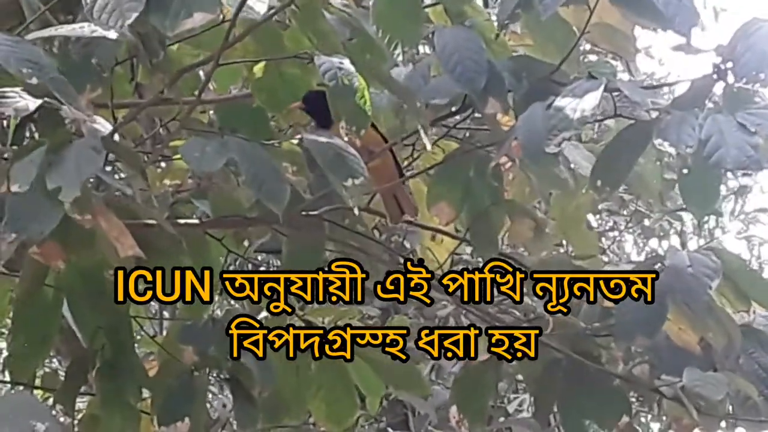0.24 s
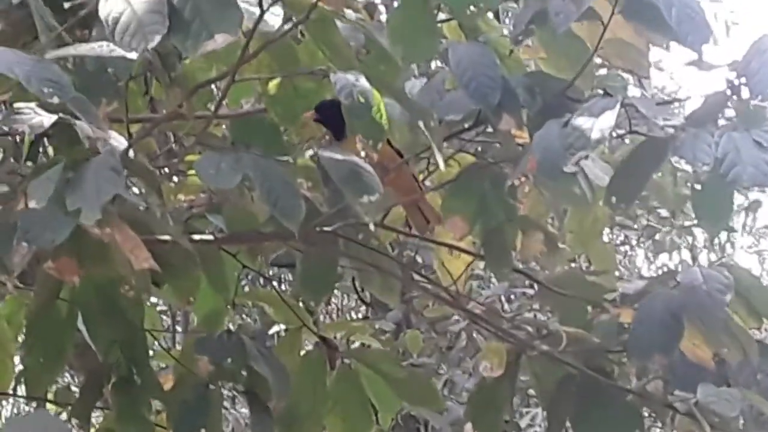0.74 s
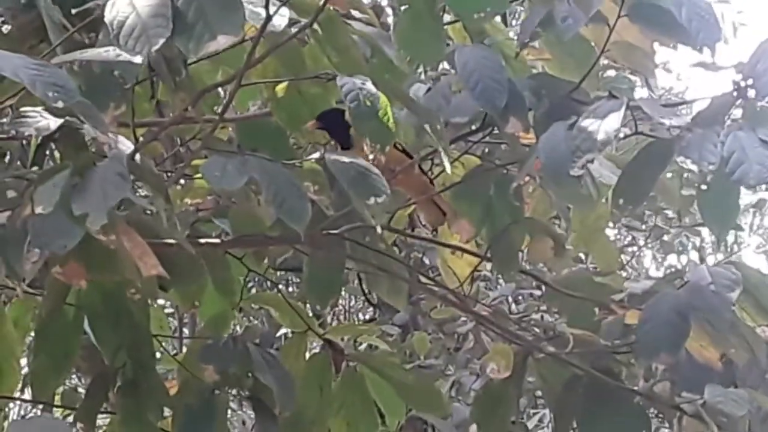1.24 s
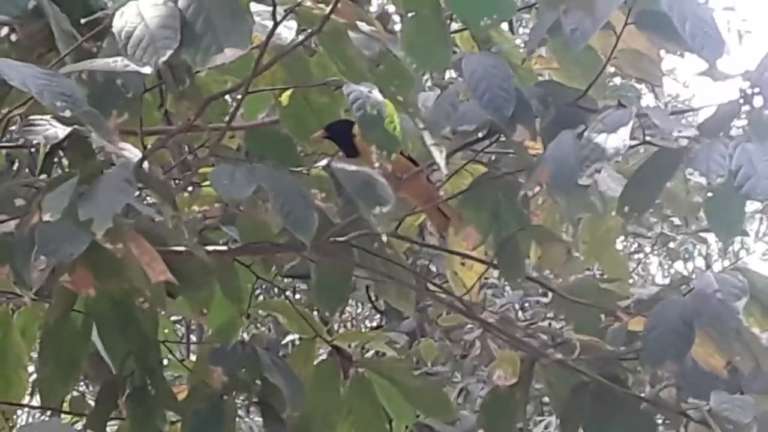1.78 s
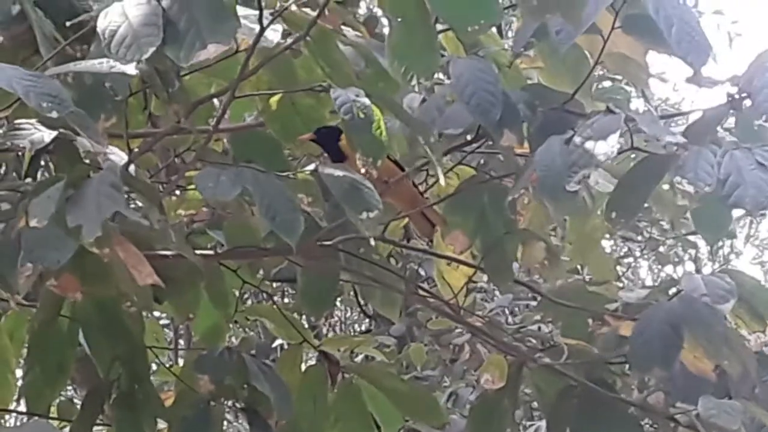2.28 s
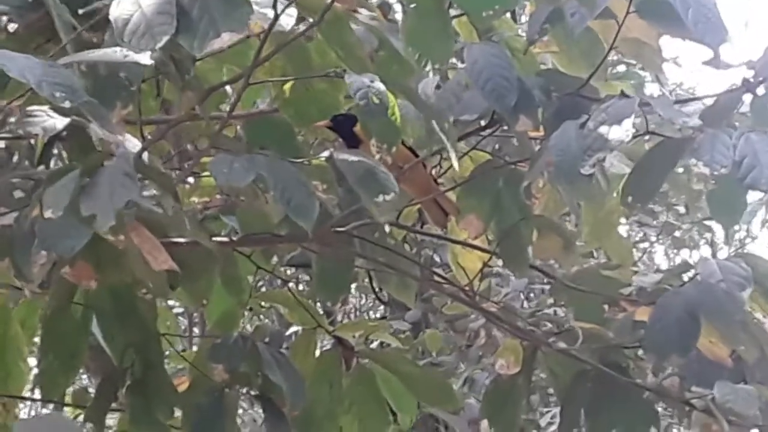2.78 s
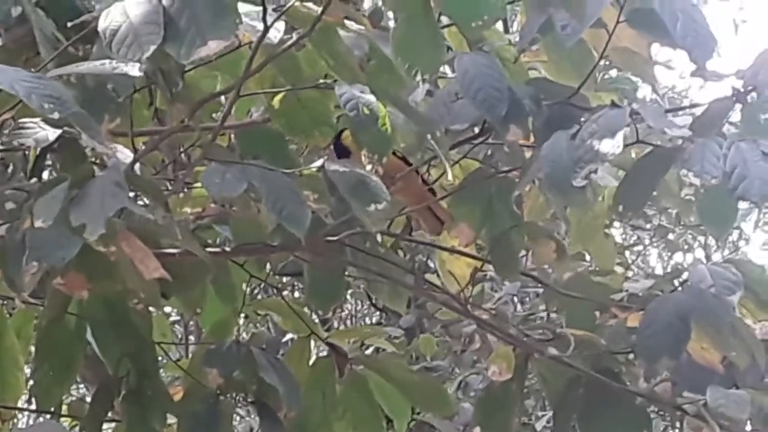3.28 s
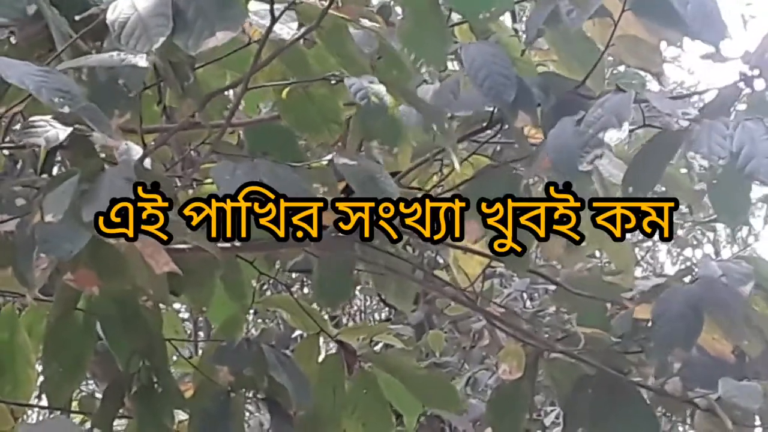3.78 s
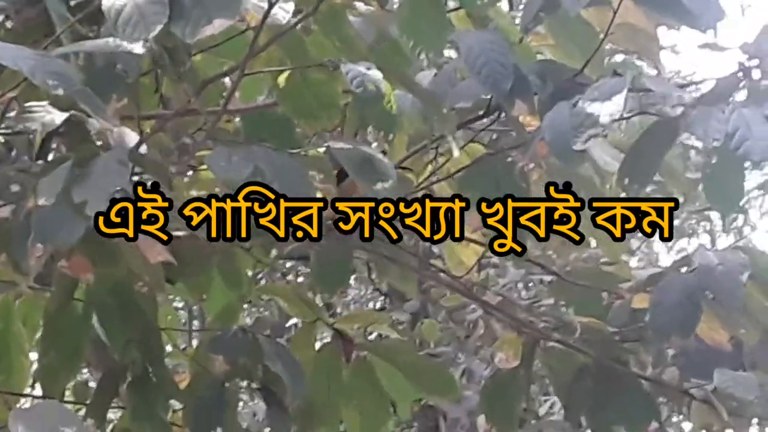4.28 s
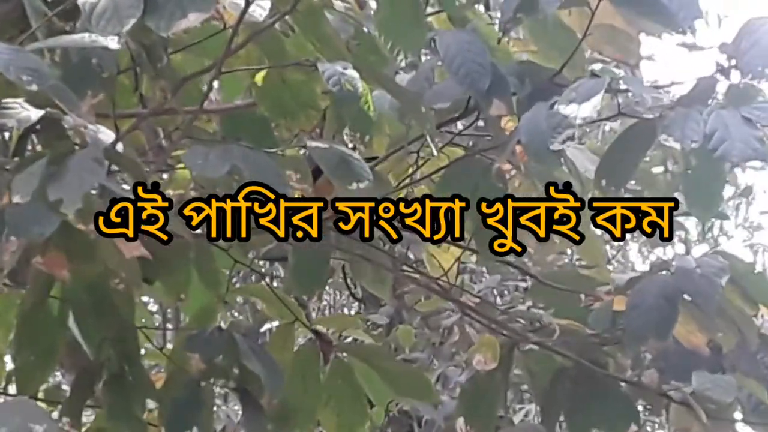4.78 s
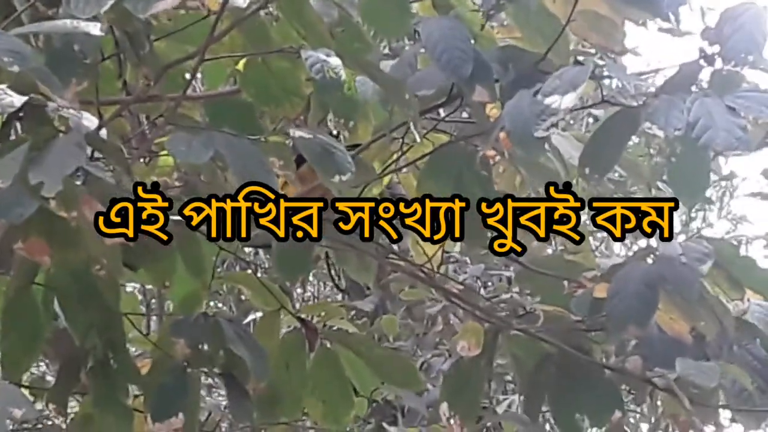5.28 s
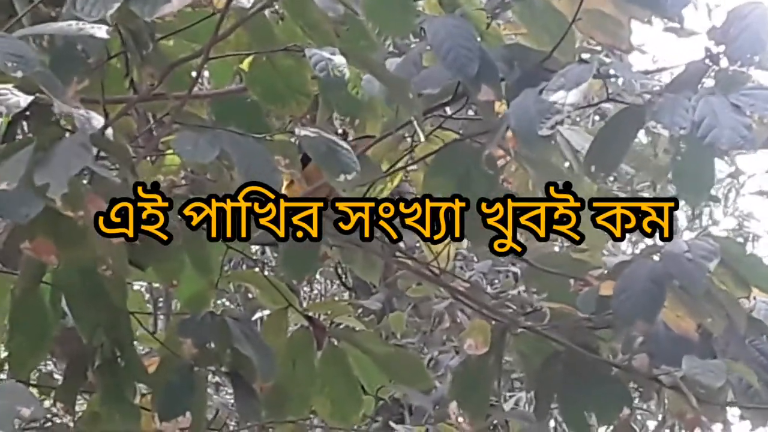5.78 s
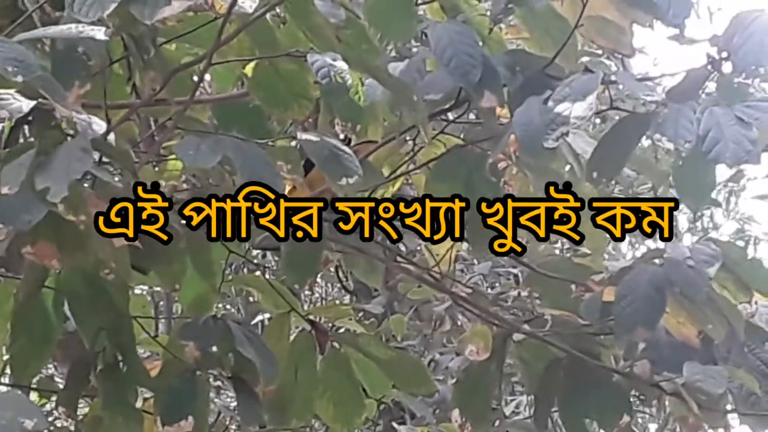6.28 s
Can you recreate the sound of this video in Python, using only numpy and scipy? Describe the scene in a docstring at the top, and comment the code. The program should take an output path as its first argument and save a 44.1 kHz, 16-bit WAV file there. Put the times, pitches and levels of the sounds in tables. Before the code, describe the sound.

Outdoors among trees, a small bird chips from start to finish: tight pairs of very short, high downward ticks, about five pairs a second, almost like a pulsing insect. They grow fainter around 3 to 4.3 seconds and become clearer again after 5. At 0.64 an oriole gives a brief hoarse rasp, then three loud, nearly pure fluty whistles at about 0.86, 1.09 and 1.3: a quick swoop down, a lower note, and a longer falling note. The same phrase returns with a rasp at 4.55 and whistles at 4.72, 4.97 and 5.17. Leaves and trunks return short echoes and soft tails. Distant birds give buzzy calls near 0, 2.6 and 5.6, and sinking whistles around 3.4 and 3.8, plus faint rising notes and hoots. Faint hiss continues, with soft low handling bumps, notably near 0.95, 5.0 and 5.5, until the end around 6.6.

```python
"""Oriole in a leafy tree

An oriole sings twice: a short hoarse rasp, then three fluty falling whistles, near-pure tones with faint overtones.
Trunks and foliage echo it: discrete reflections plus decaying noise tails.
A small bird keeps up double downward chips about five times a second; far birds are short pitch glides.
Nudges of the hand-held microphone are swells of low coloured noise, over a faint steady hiss.
"""
import sys
import numpy as np
from scipy import signal
from scipy.fft import rfft, irfft
from scipy.io import wavfile
from scipy.ndimage import uniform_filter1d

SR = 44100
rng = np.random.default_rng(int(sys.argv[2]) if len(sys.argv) > 2 else 0)


def transcribe(signal):
    """Save signal, clipped to [-1, 1], as a 16-bit WAV file at the path in sys.argv[1]."""
    frames = np.atleast_2d(signal).T
    limited = np.clip(frames, -1, 1)
    pcm = np.round(limited * 32767).astype(np.int16)
    wavfile.write(sys.argv[1], SR, pcm)


N = 288414
TIME_S = np.arange(N) / SR

# Hiss colour: f/Hz, relative density/dB
HISS_COLOUR = [(25, -9.5), (100, -1.5), (200, -9), (400, -10.5), (850, -9.5), (1000, -14), (2600, -13),
               (4000, -11), (4900, -8.5), (5600, -18.5), (8800, -22), (15500, -19)]
HISS_DB, CUTOFF_HZ = -74, 15800

# Stronger microphone nudges: onset t/s, relative level/dB
BUMPS = [(.01, -44), (.287, -49.5), (0.947, -40), (1.785, -48), (2.338, -52), (4.562, -44.5),
         (4.859, -49.5), (5.01, -36), (5.112, -40), (5.206, -47.5), (5.534, -38.5), (5.717, -56),
         (5.816, -49.5), (5.904, -43.5), (6.477, -55)]
# Bump noise colour: f/Hz, relative density/dB
BUMP_COLOUR = [(20, -32), (45, -7.5), (75, 3.5), (120, 1), (180, -14), (280, -23.5), (450, -44),
               (900, -78.5)]
# weak nudges at random times
NUDGES_PER_S, NUDGE_REL_DB, NUDGE_SPREAD_DB = 1.5, -68, 6

# Far buzzy three-syllable calls: t/s, relative level/dB
BUZZY_CALLS = [(-.135, -57), (2.579, -60.5), (5.624, -57.5)]
# Their syllables: offset t/s, length/s, start f/Hz, end f/Hz, relative level/dB, buzz spread/Hz
BUZZY_SYLLABLES = [(0, .07, 5680, 5050, -1, 370), (0.057, .1, 6500, 6000, -7, 318),
                   (0.097, 0.0844, 4990, 4800, 3, 443)]
# Level course of the far rising notes: t/s, relative level/dB
RISING_LEVEL = [(2.57, -77), (3.11, -83), (3.645, -56.5), (4.19, -76)]
RISING_START_S, RISING_INTERVAL_S, RISING_LENGTH_S = 2.565, .27, .047
RISING_FROM_HZ, RISING_TO_HZ, RISING_BUZZ_HZ = 2500, 3410, 112
# Far sinking whistles: t/s, length/s, start f/Hz, end f/Hz, relative level/dB
FAR_WHISTLES = [(0.328, 0.25, 4470, 4250, -76.5), (1.039, 0.12, 4176, 4110, -65.5),
                (1.153, .15, 3947, 3428, -68.5), (1.597, 0.053, 3375, 3100, -66.5),
                (1.94, 0.083, 1610, 1580, -67.5), (2.13, .049, 1537, 943, -68.5),
                (3.378, .13, 3802, 3404, -59), (3.55, 0.17, 4180, 3910, -68.5),
                (3.79, .29, 2780, 2704, -59), (4.06, 0.273, 2773, 2676, -69),
                (5.712, 0.22, 3923, 3552, -61.5), (6.155, .107, 1740, 1120, -68.5),
                (6.33, .15, 4490, 4410, -70), (6.343, .13, 2597, 2503, -80.5)]
FAR_WAVER = .016  # share of the start pitch
# Short harsh dropping notes: t/s, relative level/dB
HARSH_NOTES = [(.088, -65.5), (2.29, -71)]
HARSH_LENGTH_S, HARSH_FROM_HZ, HARSH_TO_HZ, HARSH_BUZZ_HZ = .045, 4350, 2950, 430
# Thin high notes of one far bird: t/s
THIN_NOTES = [2.47, 3.077, 3.281, 3.838, 4.109]
THIN_HZ, THIN_LENGTH_S, THIN_REL_DB, THIN_WAVER_HZ = 6550, .095, -85, 50
# Low hoots of another: t/s
HOOTS = [2.437, 2.573, 3.721, 3.84]
HOOT_HZ, HOOT_LENGTH_S, HOOT_REL_DB, HOOT_WAVER_HZ = 885, .07, -74, 50.4

# Small bird, peak of the first chip of each pair: t/s
CHIP_TIMES = [.138, .341, .559, .767, .939, 1.145, 1.335, 1.519, 1.695, 1.882, 2.077, 2.278, 2.493, 2.676,
              2.869, 3.095, 3.303, 3.555, 3.749, 3.945, 4.141, 4.351, 4.53, 4.742, 4.965, 5.156, 5.356,
              5.573, 5.771, 6.03, 6.253, 6.473]
# Small bird's level course: t/s, relative level/dB
CHIP_LEVEL = [(.3, -55.5), (1, -50.5), (1.55, -50.5), (2.3, -56), (3.1, -59.5), (4.15, -63.5), (5.2, -49.5),
              (5.7, -51), (6.4, -48)]

# Rasp opening each phrase: t/s, length/s, starting f/Hz, relative level/dB
RASPS = [(0.643, .051, 894.3, -47), (4.551, .068, 975.4, -45.5)]
# Rasp partial strength: f/Hz, relative level/dB
RASP_COLOUR = [(800, -9), (1700, -3.5), (2600, -0.5), (3400, -4), (4300, -1), (5200, -12), (6800, -10),
               (8000, -26), (13000, -16), (16000, -16)]
RASP_ATTACK_S, RASP_RELEASE_S, RASP_SAG_HZ_PER_S = .014, .01, 2300
RASP_SLACK_DB, RASP_SLACK_PITCH = -26, .25  # without effort: weaker, and lower by this share
RASP_CLOSED_HZ, RASP_OPEN_HZ = 1206, 6110  # upper edge of the partials as the bill opens

# Whistles, two phrases of a swoop, a low note and a long note:
# t/s, length/s, swell/s, pitch settling/s, steepest fall after/s, ease of fall/s,
# onset f/Hz, held f/Hz, end f/Hz, end drift/(Hz/s), relative level/dB, change after fall/dB,
# catch at foot of fall/dB, overtones/dB, extra overtones above 6 kHz/dB
WHISTLES = [(.857, .12, 0.052, 0.035, .094, .0123, 1715, 1847, 704, 0, -22.5, 0, 0, 5, -10.5),
            (1.087, .188, .048, .02, .101, .0205, 1410, 1392, 913.4, -350, -21, -4, -2, -1, -6.5),
            (1.304, 0.23, .016, .013, 0.12, .013, 2000, 1788, 1139, 450, -21.5, 2, 0, 1, -1.5),
            (4.719, 0.11, 0.046, .026, 0.095, 0.015, 1694, 1930, 707, 0, -23, 0, -0.5, 3, -8.5),
            (4.969, .19, 0.03, .0224, 0.089, 0.016, 1545, 1502, 844, 350, -25, 7.5, -17, -1, -5),
            (5.17, 0.26, 0.015, .018, 0.12, .0135, 2043, 1740, 1134, -600, -22.5, -1, 1.5, -2, 6)]
# Whistle overtone strength: f/Hz, relative level/dB
WHISTLE_OVERTONES = [(1700, -11.5), (2400, -27), (3000, -32.5), (3500, -34), (4400, -46), (5500, -50.5),
                     (6300, -57), (7200, -49.5), (7900, -53.5), (9200, -65), (10600, -56.5), (12300, -63.5),
                     (14300, -51.5), (16000, -55)]
# Throat gain, favouring upper pitches: f/Hz, gain/dB
THROAT = [(700, -22.5), (880, -13.5), (1150, -10.5), (1600, 0.5), (1900, 2)]
SWELL_STEEPNESS, ONSET_S, RELEASE_S, FADE_DB_PER_S = 4.3, .003, .027, 58
IDLE_DB = -28  # floor of the swell
# brief change of level and pitch at the foot of the fall
CATCH_AFTER_EASES, CATCH_S, CATCH_PITCH_PER_DB = 1.25, .016, .003
# the low end is less steady, and purer
END_WAVER, END_WAVER_RATE_HZ, END_OVERTONE_DB = .0098, 45, -1.5
# Reflections off branches and ground: delay/s, share of the direct sound
ECHOES = [(.0053, .26), (0.0098, .16), (0.034, .08)]


def from_db(db):
    """Decibels to amplitude gain."""
    return 10 ** (np.asarray(db) / 20)


def rms_one(x):
    """Scale to unit power."""
    return x / np.sqrt(np.mean(x ** 2) + 1e-20)


def at_hz(points, hz):
    """Gain at hz, interpolated in dB over log frequency."""
    knots_hz, db = np.transpose(points)
    return from_db(np.interp(np.log(hz + 1e-9), np.log(knots_hz), db))


def drift(rate_hz, size=N):
    """Straight lines between normal random knots of spread 1, rate_hz knots per second."""
    steps = np.arange(size) * rate_hz / SR
    return np.interp(steps, np.arange(size), rng.standard_normal(size))


def noise(colour):
    """Unit-power steady noise: a white spectrum weighted by colour."""
    white = rfft(rng.standard_normal(N))
    gain = at_hz(colour, np.fft.rfftfreq(N, 1 / SR))
    return rms_one(irfft(white * gain, N))


def phase_of(hz):
    """Phase in radians: the running integral of pitch."""
    return 2 * np.pi * np.cumsum(hz) / SR


def add(track, start_s, sound):
    """Mix a sound into a track, dropping what lies outside."""
    at = round(start_s * SR) + np.arange(len(sound))
    inside = (at >= 0) & (at < N)
    track[at[inside]] += sound[inside]


def above(x, edge_hz):
    """Fourth-order Butterworth high-pass."""
    return signal.sosfilt(signal.butter(4, edge_hz, "high", fs=SR, output="sos"), x)


def scatter(x, delay_s, swell_s, t60_s):
    """Countless leaves and trunks return a noise tail that swells and decays exponentially."""
    t = TIME_S[:2 * SR]
    late_s = np.maximum(t - delay_s, 0)
    shape = (1 - np.exp(-late_s / swell_s)) * from_db(-60 * late_s / t60_s)
    spectrum = rfft(rng.standard_normal(len(t)) * shape)
    # spread the energy evenly over frequency
    local_power = uniform_filter1d(abs(spectrum) ** 2, size=100)
    tail = irfft(spectrum / np.sqrt(local_power)) * (t > delay_s)
    return signal.fftconvolve(x, tail[:SR])[:N]


def hiss():
    """Steady coloured noise."""
    return from_db(HISS_DB) * noise(HISS_COLOUR)


def bumps(rise_s=.017, level_db=-7):
    """Each microphone nudge swells a low rumble, over a faint rumble of wandering level."""
    struck = rng.random(N) < NUDGES_PER_S / SR
    nudges = struck * from_db(NUDGE_REL_DB + NUDGE_SPREAD_DB * rng.standard_normal(N))
    for start_s, db in BUMPS:
        add(nudges, start_s, from_db([db]))
    t = TIME_S[:SR // 4] / rise_s
    swell = (t * np.exp(1 - t)) ** 2
    push = from_db(level_db) * signal.fftconvolve(nudges, swell)[:N]
    floor = from_db(-81.5 + 4.9 * drift(4.5))
    return (push + floor) * noise(BUMP_COLOUR)


def glide(length_s, start_hz, end_hz, db, buzz_hz):
    """Far note: a straight pitch slide roughened by fast random wavering."""
    u = np.arange(0, 1, 1 / (length_s * SR))
    waver_hz = buzz_hz * drift(600, size=SR)[:len(u)]
    hz = start_hz + (end_hz - start_hz) * u + waver_hz
    envelope = np.sqrt(2 * np.sin(np.pi * u))
    return from_db(db) * envelope * np.sin(phase_of(hz))


def far_birds(count=7):
    """Far glides; the wood's reverberation is strongest for the higher ones."""
    out = np.zeros(N)
    for s, call_db in BUZZY_CALLS:
        for after_s, length_s, start_hz, end_hz, db, buzz_hz in BUZZY_SYLLABLES:
            add(out, s + after_s, glide(length_s, start_hz, end_hz, call_db + db, buzz_hz))
    for s in RISING_START_S + RISING_INTERVAL_S * np.arange(count):
        db = np.interp(s, *np.transpose(RISING_LEVEL))
        add(out, s, glide(RISING_LENGTH_S, RISING_FROM_HZ, RISING_TO_HZ, db, RISING_BUZZ_HZ))
    for s, length_s, start_hz, end_hz, db in FAR_WHISTLES:
        add(out, s, glide(length_s, start_hz, end_hz, db, FAR_WAVER * start_hz))
    for s, db in HARSH_NOTES:
        add(out, s, glide(HARSH_LENGTH_S, HARSH_FROM_HZ, HARSH_TO_HZ, db, HARSH_BUZZ_HZ))
    for s in THIN_NOTES:
        add(out, s, glide(THIN_LENGTH_S, THIN_HZ, THIN_HZ, THIN_REL_DB, THIN_WAVER_HZ))
    for s in HOOTS:
        add(out, s, glide(HOOT_LENGTH_S, HOOT_HZ, HOOT_HZ, HOOT_REL_DB, HOOT_WAVER_HZ))
    direct = from_db(-6) * (out + scatter(out, delay_s=.002, swell_s=.002, t60_s=.15))
    reverberation = scatter(above(out, 2000), delay_s=.003, swell_s=.004, t60_s=.56)
    return direct + from_db(-2) * reverberation


def small_bird(top_hz=5570, bottom_hz=4380, gap_s=.0138, level_db=3.5):
    """Pairs of quick downward chips with a sharp start, the first a little weaker."""
    u = np.arange(0, 1, 1 / (.0098 * SR))  # one chip lasts 9.8 ms
    shape = np.sin(np.pi * u ** .72) ** 2
    peak_s = np.argmax(shape) / SR
    out = np.zeros(N)
    strays = rng.standard_normal((len(CHIP_TIMES), 2))
    for s, pair_strays in zip(CHIP_TIMES, strays):
        db = np.interp(s, *np.transpose(CHIP_LEVEL)) + level_db
        for chip_s, gain_db, stray in zip((s, s + gap_s), (-4.5, 0), pair_strays):
            hz = (top_hz + (bottom_hz - top_hz) * u) * (1 + .012 * stray)
            chip = from_db(db + gain_db) * shape * np.sin(phase_of(hz))
            add(out, chip_s - peak_s, chip)
    leaves = scatter(out, delay_s=.004, swell_s=.003, t60_s=.4)
    late_tail = scatter(out, delay_s=.049, swell_s=.039, t60_s=.99)
    return out + from_db(-2) * leaves + from_db(-20.5) * late_tail


def rasp(start_s, length_s, pitch_hz, level_db, closed_db=-24):
    """Hoarse stack of partials that sags in pitch and brightens as the bill opens."""
    t = np.arange(0, length_s, 1 / SR)
    size = len(t)
    effort = np.minimum(np.minimum(t / RASP_ATTACK_S, (length_s - t) / RASP_RELEASE_S), 1)
    slack = 1 - effort
    hz = (pitch_hz - RASP_SAG_HZ_PER_S * t) * (1 - RASP_SLACK_PITCH * slack)
    hz = hz * (1 + .012 * drift(900, size=size))
    phase = phase_of(hz)
    edge_hz = RASP_CLOSED_HZ + (RASP_OPEN_HZ - RASP_CLOSED_HZ) * t / length_s
    stack, out = 0, np.zeros(N)
    for k in range(1, 19):
        opening = np.maximum(1 / (1 + (k * hz / edge_hz) ** 6), from_db(closed_db))
        # upper partials swell and scrape irregularly
        rough = min(k / 4, 1) * (.4 * drift(120, size=size) + .65 * drift(900, size=size))
        stack += (1 + rough) * opening * at_hz(RASP_COLOUR, k * hz) * np.sin(k * phase)
    add(out, start_s, np.sqrt(2) * from_db(level_db + RASP_SLACK_DB * slack) * stack)
    return out


def whistle(start_s, length_s, swell_s, settle_s, fall_at_s, ease_s, onset_hz, held_hz, end_hz, end_hz_per_s,
            level_db, end_db, catch_db, overtone_db, treble_db, half_db=-14):
    """Tone that swells, settles, falls and fades; its unsteady overtones, half-steps included, are separate."""
    t = np.arange(0, length_s, 1 / SR)
    size = len(t)
    effort = 1 / (1 + np.exp(SWELL_STEEPNESS * (1 - t / swell_s)))
    # 1 before the fall, 0 after
    height = np.exp(-np.exp((t - fall_at_s) / ease_s))
    fallen_s = np.maximum(t - fall_at_s, 0)
    catch_at_s = fall_at_s + CATCH_AFTER_EASES * ease_s
    catch_course_db = catch_db * np.exp(-((t - catch_at_s) / CATCH_S) ** 2)

    upper_hz = held_hz + (onset_hz - held_hz) * np.exp(-(t / settle_s) ** 2)
    end_waver = 1 + END_WAVER * drift(END_WAVER_RATE_HZ, size=size)
    lower_hz = (end_hz + end_hz_per_s * fallen_s) * end_waver
    hz = (lower_hz + (upper_hz - lower_hz) * height) * (1 + CATCH_PITCH_PER_DB * catch_course_db)

    gate = np.minimum(t / ONSET_S, 1) * np.minimum((length_s - t) / RELEASE_S, 1)
    swell = np.maximum(effort, from_db(IDLE_DB))
    course_db = level_db + end_db * (1 - height) + catch_course_db - FADE_DB_PER_S * fallen_s
    envelope = gate * swell * at_hz(THROAT, hz) * from_db(course_db)

    phase = phase_of(hz * (1 + .0012 * drift(400, size=size)))
    overtones = 0
    for k in np.r_[2, 3, 4:13:.5]:
        db = overtone_db + treble_db * (k * hz > 6000) + half_db * (k % 1 > 0)
        db = db + 3 * drift(90, size=size)
        # higher overtones blur more
        blur = .1 * k * drift(450, size=size)
        gain = from_db(db) * at_hz(WHISTLE_OVERTONES, k * hz) * (k * hz < SR / 2)
        overtones += gain * np.sin(k * phase + blur)
    overtones = overtones * from_db(END_OVERTONE_DB * (1 - height))

    out = np.zeros((2, N))
    for track, part in zip(out, (np.sin(phase), overtones)):
        add(track, start_s, np.sqrt(2) * envelope * part)
    return out


def oriole():
    """Two phrases with near reflections, foliage tails and a late return from far trees."""
    tones, overtones = sum(whistle(*row) for row in WHISTLES)
    rasps = sum(rasp(*row) for row in RASPS)
    # leaves around the bird smear the higher overtones
    smear = scatter(above(overtones, 3800), delay_s=.001, swell_s=.001, t60_s=.14)
    song = tones + rasps + from_db(-4) * overtones + from_db(-2) * smear
    near = sum(share * np.interp(TIME_S - delay_s, TIME_S, song) for delay_s, share in ECHOES)
    tail = scatter(song, delay_s=.0044, swell_s=.012, t60_s=.49)
    # leaves throw back short waves more strongly than long ones
    bright = scatter(above(rasps + overtones, 2500), delay_s=.0028, swell_s=.003, t60_s=.33)
    far_trees = scatter(above(song, 1960), delay_s=.33, swell_s=.07, t60_s=.98)
    return song + near + from_db(-15.5) * tail + from_db(-2) * bright + from_db(-34.5) * far_trees


def scene():
    """Sum of hiss, bumps and birds, one channel."""
    return (hiss() + bumps() + far_birds() + small_bird() + oriole())[None]


def record(dry):
    """Steep elliptic low-pass."""
    return signal.sosfilt(signal.ellip(10, .1, 70, CUTOFF_HZ, fs=SR, output="sos"), dry)


dry = scene()
out = record(dry)
transcribe(out)
```